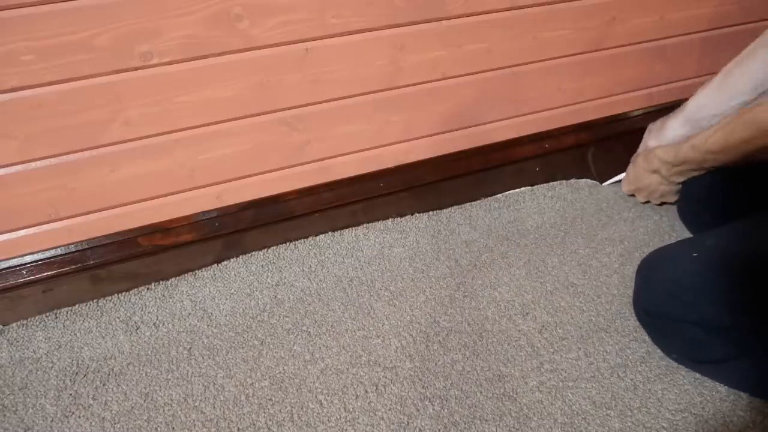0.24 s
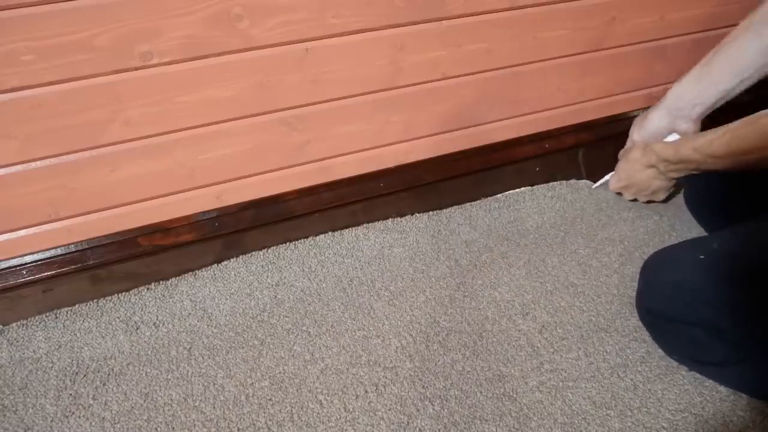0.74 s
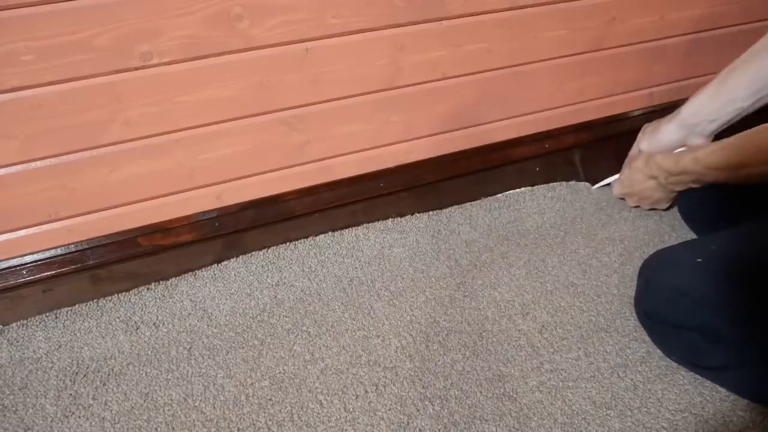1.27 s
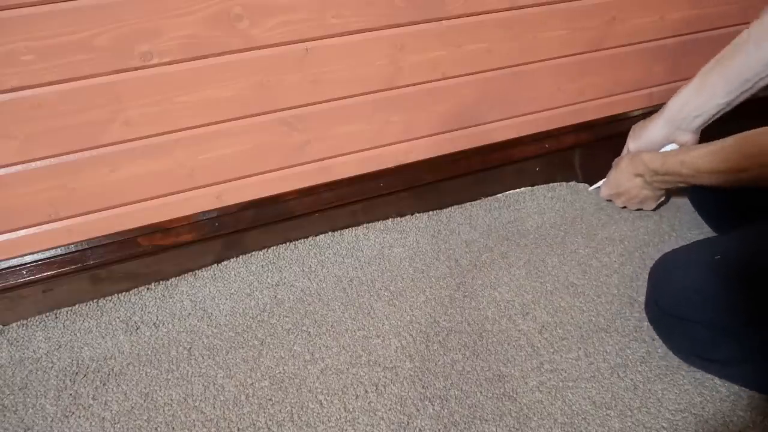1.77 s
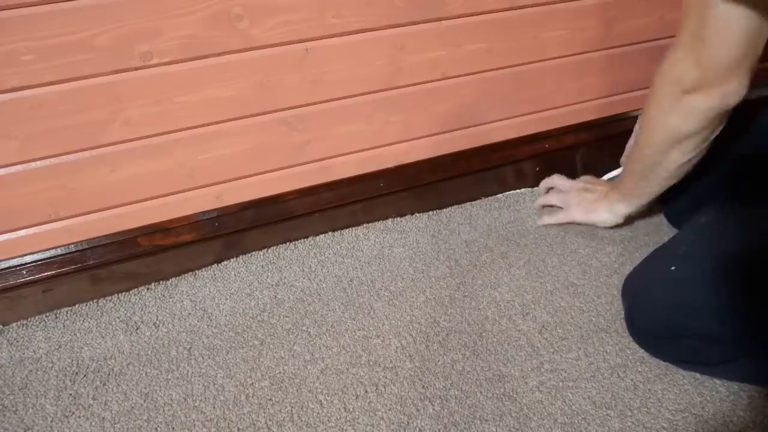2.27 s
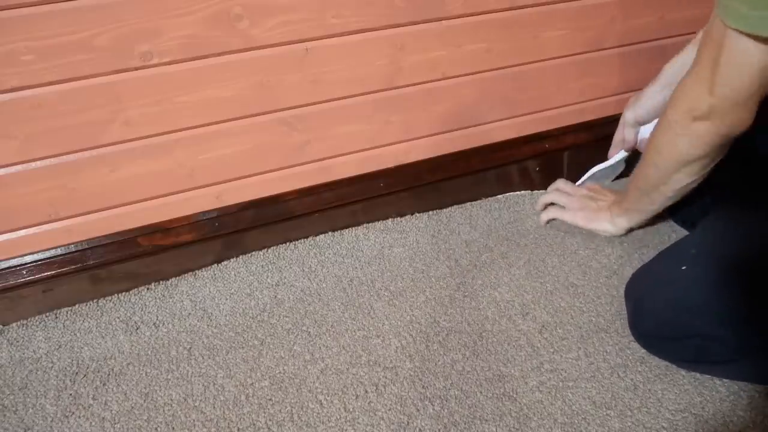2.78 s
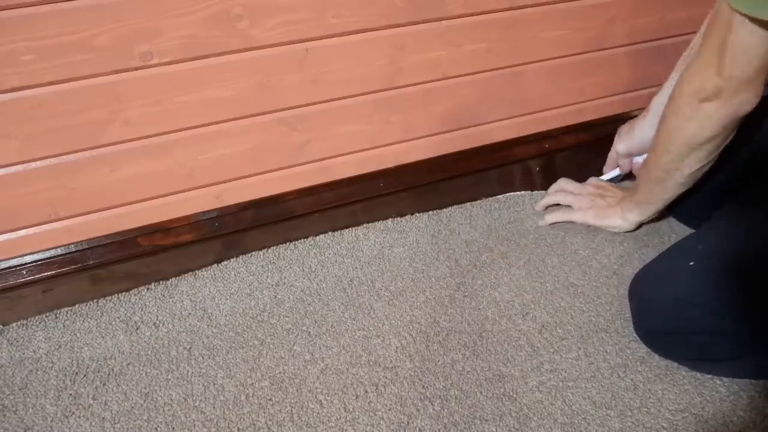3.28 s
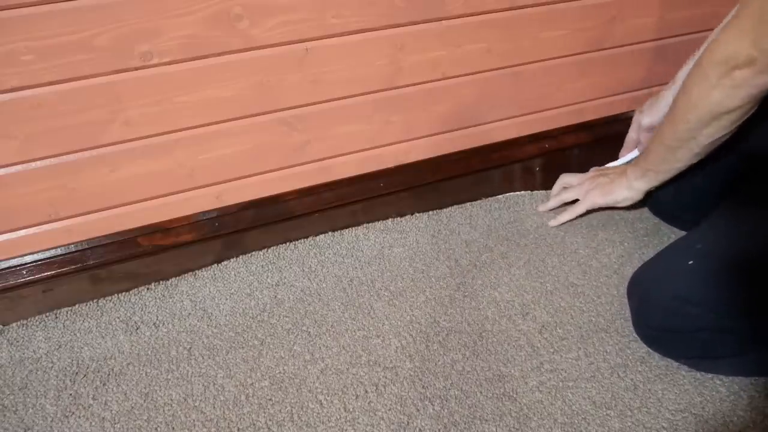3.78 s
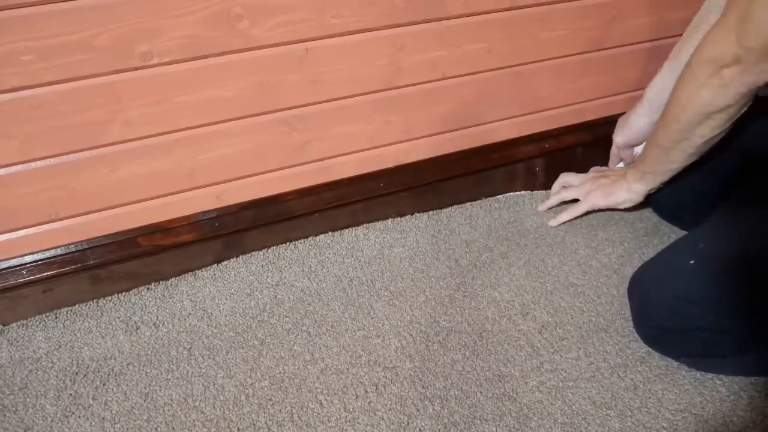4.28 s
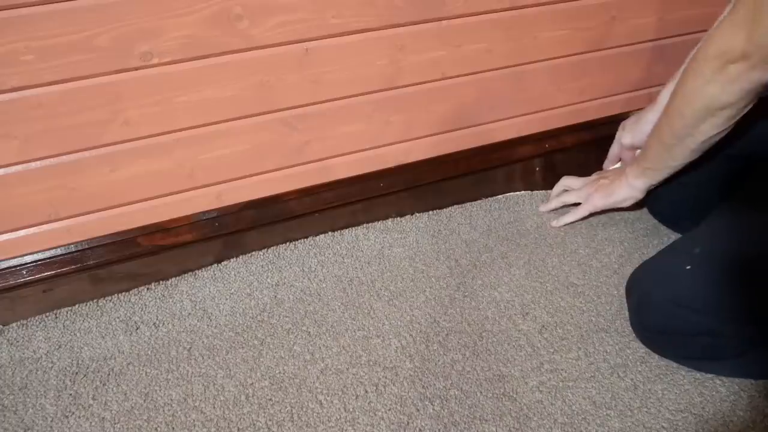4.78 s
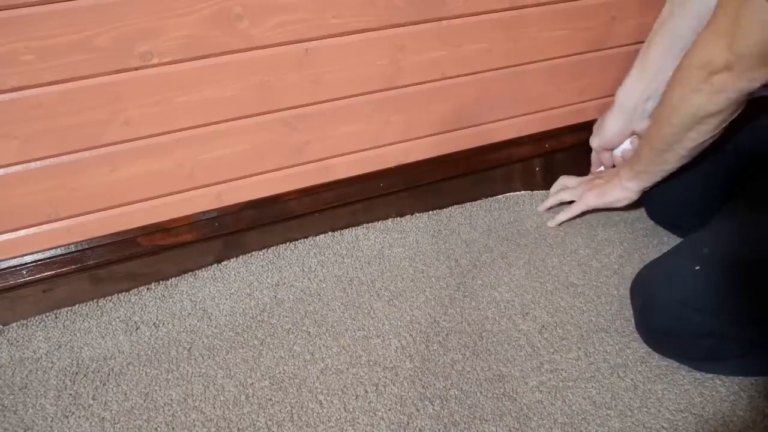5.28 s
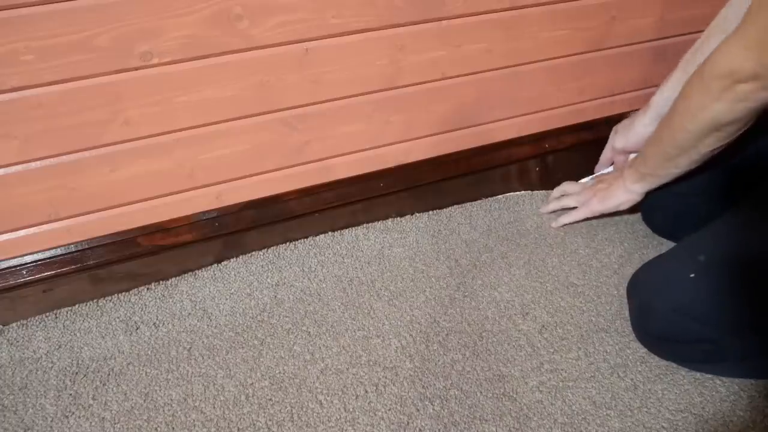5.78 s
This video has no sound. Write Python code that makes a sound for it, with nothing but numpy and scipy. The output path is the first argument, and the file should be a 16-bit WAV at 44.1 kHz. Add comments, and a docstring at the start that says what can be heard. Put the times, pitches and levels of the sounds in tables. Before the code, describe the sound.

Uneven scratchy rustles and small clicks as a hand tool tucks carpet against a wooden baseboard, snapping sharply against it midway.

```python
"""A tucking blade pushes the edge of a wool carpet under a wooden baseboard.
Each stroke flicks pile fibres and drags the stiff backing; the blade scrapes, squeaks and snaps
against the board, once hard and twice over. The kneeling worker's shifting weight sways the floor.
A small panelled room, heard through a hissy microphone with a nasal housing resonance."""
import sys
import numpy as np
from scipy import signal
from scipy.fft import rfft, irfft
from scipy.io import wavfile

SR = 44100
rng = np.random.default_rng(int(sys.argv[2]) if len(sys.argv) > 2 else 0)


def pcm_store(signal):
    """Save signal as 16-bit PCM."""
    levels = np.round(np.clip(np.atleast_2d(signal), -1, 1) * 32767)
    wavfile.write(sys.argv[1], SR, levels.astype(np.int16).T)


N = 266501
TIME = np.arange(N) / SR
HZ = np.fft.rfftfreq(N, 1 / SR)

# baseboard modes: f/Hz, level/dB, t60/s
BOARD_MODES = [(183, -10.5, 0.087), (232, -1, 0.051), (327, -10, 0.097), (341, -10, 0.048),
               (578, -6.5, 0.058), (700, -5.5, 0.015)]
# blade pushes: peak t/s, rise/s, fall/s, pile/dB, backing/dB, treble boost/dB, boom boost/dB
STROKES = [(.04, 0.096, 0.17, -66.5, -57.5, 3, 1), (.2, 0.16, 0.044, -57, -65, -8, -11),
           (.333, 0.049, 0.045, -45.5, -49.5, -5, -8), (.43, .04, 0.07, -56, -65, -6, -8),
           (0.857, 0.075, 0.067, -50, -45, -0.5, 1.5), (1.21, 0.029, 0.041, -54, -53, -16, -1),
           (1.39, 0.03, 0.05, -54, -77, -11, -10), (1.775, 0.087, 0.06, -51, -53.5, -2, 5),
           (1.85, 0.062, 0.2, -52, -53, -2.5, 2), (2.16, 0.093, 0.18, -43.5, -43.5, -16, -1),
           (2.22, 0.1, 0.31, -48.5, -42, -3.5, 0), (2.39, 0.017, 0.016, -43.5, -51, -0.5, -12),
           (2.582, 0.041, 0.057, -46, -45, -4.5, -12), (2.7, 0.079, 0.21, -57.5, -53, -12, 0),
           (2.89, 0.15, 0.11, -59.5, -58, 1, 5.5), (3.38, 0.26, 0.14, -62.5, -60, -12, 5),
           (3.615, 0.014, 0.013, -47, -60, -6, 7), (3.68, 0.074, 0.12, -52, -62, -1.5, -5),
           (3.816, 0.045, 0.087, -56.5, -64, 4, -16), (3.98, 0.012, 0.018, -51.5, -52.5, -2, -8),
           (4.19, 0.05, 0.028, -48.5, -55, -3.5, 4), (4.24, 0.033, 0.019, -61, -53.5, 6, 13.5),
           (4.35, 0.019, 0.045, -55.5, -55.5, -0.5, 10), (4.594, 0.065, 0.075, -45.5, -52, -6.5, -3),
           (4.735, 0.041, 0.071, -52.5, -58, -8, -12), (5.0, 0.23, 0.15, -66.5, -70, 8, -3),
           (5.175, 0.075, 0.067, -58.5, -52.5, 2, 7), (5.312, 0.043, 0.019, -42.5, -48, -5.5, 5),
           (5.365, 0.036, 0.0098, -42, -65, -6, 7), (5.51, 0.028, 0.073, -57, -62.5, 2, 13),
           (5.604, 0.035, 0.035, -44, -55, -1.5, -1), (5.75, 0.036, 0.012, -66, -52, 12, 3),
           (6.02, 0.035, 0.06, -55.5, -54, -8, 9)]


def gain_of(db):
    """Decibels to amplitude."""
    return 10 ** (np.asarray(db) / 20)


def unit_rms(x):
    """Scale to rms 1."""
    return x / np.sqrt(np.mean(x ** 2) + 1e-20)


def log_interp(points, hz):
    """Interpolate (f/Hz, value) rows over log frequency."""
    f, value = np.transpose(points)
    return np.interp(np.log(hz + 1), np.log(f + 1), value)


def shaped(x, response):
    """Zero-phase filter; one gain per HZ bin."""
    return irfft(rfft(x) * response, N)


def coloured(x, spectrum):
    """Filter by (f/Hz, level/dB) rows; rms 1."""
    return unit_rms(shaped(x, gain_of(log_interp(spectrum, HZ))))


def noise(spectrum, db):
    """Steady coloured noise at an rms level."""
    return gain_of(db) * coloured(rng.standard_normal(N), spectrum)


def add(mix, start_s, sound):
    """Mix a sound in, in place."""
    part = mix[max(round(start_s * SR), 0):][:len(sound)]
    part += sound[:len(part)]


def wander(rate_hz):
    """Smooth random curve, rms 1."""
    return unit_rms(shaped(rng.standard_normal(N), 1 / (1 + (HZ / rate_hz) ** 4)))


def resonate(x, hz, width_hz):
    """One resonance, peak gain 1."""
    return signal.lfilter(*signal.iirpeak(hz, hz / width_hz, fs=SR), x)


def ringing(x, modes):
    """Input plus the resonances it excites."""
    return x + sum(gain_of(db) * resonate(x, hz, width_hz) for hz, width_hz, db in modes)


def butter(x, hz, kind, order=2):
    """Causal low-pass or high-pass."""
    return signal.sosfilt(signal.butter(order, min(hz, .45 * SR), kind, fs=SR, output="sos"), x)


def swells(peak_s, rise_s, fall_s, level_db, roundness=1.8):
    """Envelope of swells summed in power; roundness 1 is pointed, 2 a bell."""
    t, power = TIME[::32], 0
    for s, rise, fall, db in zip(peak_s, rise_s, fall_s, level_db):
        away = np.maximum((s - t) / rise, (t - s) / fall)
        power += (gain_of(db) * np.exp(-abs(away) ** roundness)) ** 2
    return np.interp(TIME, t, np.sqrt(power))


def gliding(length_s, hz, glide_hz):
    """Complex tone that swells, slides through hz and fades."""
    pitch_hz = hz + glide_hz * np.linspace(-.5, .5, int(length_s * SR))
    return np.hanning(len(pitch_hz)) * np.exp(2j * np.pi * np.cumsum(pitch_hz) / SR)


def friction(slips_per_s, spread_db, rub, clump_db, clump_hz):
    """Tiny uneven slips over a smooth rub, bunched by stick-slip."""
    size = gain_of(spread_db * np.minimum(rng.exponential(1, N), 4))
    slips = size * rng.choice([-1., 1.], N) * (rng.random(N) < slips_per_s / SR)
    return (unit_rms(slips) + rub * rng.standard_normal(N)) * gain_of(clump_db * wander(clump_hz))


def room_tone():
    """Steady background, strongest in the bass."""
    # spectrum: f/Hz, relative level/dB
    spectrum = [(20, -18), (33, 0), (60, 6.5), (120, 4), (230, 5.5), (500, 1), (1000, -1), (2000, -2),
                (4000, -3), (8000, -5), (15000, -7)]
    return noise(spectrum, db=-58)


def reverb(x):
    """Dense reflections off panelled walls; each band decays at its own rate."""
    # f/Hz, t60/s
    decay = [(150, 0.27), (500, 0.69), (1500, 0.48), (4000, 0.48), (8000, 0.97), (14000, 0.25)]
    taps = rng.choice([-1., 1.], SR) * (rng.random(SR) < 4000 / SR) * (TIME[:SR] > .004)
    hz, t, bands = signal.stft(taps, SR, nperseg=256)
    early = 1 + 2.5 * np.exp(-t / 0.053)  # nearest walls: first and strongest
    fade = gain_of(-60 * t / log_interp(decay, hz)[:, None])
    tail = signal.istft(bands * early * fade, SR, nperseg=256)[1]
    return signal.fftconvolve(x, butter(tail / np.linalg.norm(tail), 9300, "low"))[:N]


def slapback(x):
    """First reflections off the floor and nearest wall."""
    # echoes: delay/s, level/dB
    echoes = [(.0044, -20), (.0104, -25), (0.0133, -29)]
    out = x.copy()
    for delay_s, db in echoes:
        add(out, delay_s, gain_of(db) * butter(x, 8400, "low"))
    return out


def floor_sway(hz=41.8, drift_hz=2, width_hz=13, tremble_db=-61.5):
    """The lowest floor mode swells as weight shifts and trembles faintly in between."""
    # weight shifts on the knees: peak t/s, rise and fall/s, level/dB
    shifts = [(.03, 0.082, -50), (1.08, 0.095, -45.5), (1.5, 0.053, -55), (1.79, 0.093, -51),
              (2.07, 0.069, -36.5), (2.28, 0.11, -40.5), (2.47, 0.074, -49), (3.37, 0.061, -48),
              (4.13, 0.066, -46), (4.3, 0.055, -45.5), (5.16, 0.056, -44), (5.5, 0.11, -56),
              (5.96, 0.066, -60)]
    peak_s, ramp_s, db = np.transpose(shifts)
    cycles = np.cumsum(hz + drift_hz * wander(15)) / SR
    sway = unit_rms(np.sin(2 * np.pi * cycles)) * swells(peak_s, ramp_s, ramp_s, db, roundness=1.6)
    tremble = resonate(resonate(rng.standard_normal(N), hz, width_hz), hz, width_hz)
    return sway + gain_of(tremble_db) * unit_rms(tremble)


def idle_rub(db, swing_db=2, rest_db=-14.5, rest_s=0.057):
    """Envelope of light hand rubbing between pushes; dips at each rest."""
    # hands still: t/s
    rests = [.57, 1.56, 4.05, 4.44, 4.85]
    still = sum(np.exp(-((TIME - s) / rest_s) ** 2) for s in rests)
    return gain_of(db + swing_db * wander(11) + rest_db * still)


def backing_drag(board_db=-4, boom_hz=210, boom_octaves=0.49, ramp_scale=0.97):
    """Stiff backing slips coarsely and rings the baseboard; leaning on the board adds boom."""
    # drag spectrum: f/Hz, relative level/dB
    spectrum = [(50, 0.5), (110, -2), (150, -0.5), (185, 0), (240, -4), (350, -1.5), (550, -5), (800, -6),
                (1200, -9), (1800, -22), (5000, -49)]
    slips = friction(slips_per_s=1000, spread_db=2.5, rub=.6, clump_db=1.1, clump_hz=35)
    modes = [(hz, 2.2 / t60, db + board_db) for hz, db, t60 in BOARD_MODES]
    drag = coloured(ringing(slips, modes), spectrum)
    boom = shaped(drag, np.exp(-(np.log2((HZ + 1) / boom_hz) / boom_octaves) ** 2))
    peak_s, rise_s, fall_s, _, backing_db, _, lean_db = np.transpose(STROKES)
    timing = peak_s, rise_s * ramp_scale, fall_s * ramp_scale
    idle = idle_rub(db=-62.5)
    push = np.hypot(idle, swells(*timing, backing_db))
    boom_push = np.hypot(idle, swells(*timing, backing_db + lean_db))
    return (drag - boom) * push + boom * boom_push


def pile_flicks(treble_hz=5500):
    """Wool fibres flick past the blade; a steeper blade is brighter."""
    # fibre spectrum: f/Hz, relative level/dB
    spectrum = [(300, -24), (700, -19), (1100, 0.5), (1800, -0.5), (2500, -0.5), (3500, -1.5), (4700, -4),
                (5600, -1), (7500, -4.5), (9000, -9.5), (12000, -11), (16000, -56)]
    # blade resonances: f/Hz, width/Hz, level/dB
    blade_modes = [(3400, 140, -7), (3830, 380, -9), (6300, 150, -18)]
    fibres = friction(slips_per_s=3500, spread_db=1, rub=1, clump_db=1.5, clump_hz=57)
    rustle = coloured(ringing(fibres, blade_modes), spectrum)
    treble = shaped(rustle, HZ ** 4 / (HZ ** 4 + treble_hz ** 4))
    peak_s, rise_s, fall_s, pile_db, _, steep_db, _ = np.transpose(STROKES)
    idle = idle_rub(db=-63.5)
    push = np.hypot(idle, swells(peak_s, rise_s, fall_s, pile_db))
    treble_push = np.hypot(idle, swells(peak_s, rise_s, fall_s, pile_db + steep_db))
    return (rustle - treble) * push + treble * treble_push


def brief_chafes():
    """Short narrow-band rubs: low board groans, mid backing rasps, nasal ticks and high blade scrapes."""
    # rubs: centre t/s, length/s, f/Hz, glide/Hz, width/Hz, level/dB
    rubs = [(0.131, 0.25, 2550, 0, 160, -66), (.19, 0.12, 3400, -100, 300, -63),
            (0.312, 0.078, 346, 7, 50, -49.5), (0.333, 0.098, 160.3, -3, 50, -51.5),
            (.332, 0.086, 951, -3, 600, -50.5), (0.333, 0.059, 1380, -47, 300, -52),
            (0.336, 0.063, 2600, -2, 900, -51), (.82, 0.088, 950, 3, 700, -52.5),
            (0.849, 0.14, 206, -5, 70, -46), (0.851, .11, 740, -9, 100, -52),
            (0.88, 0.076, 3490, 0, 1000, -47), (1.772, 0.074, 3490, -2, 1000, -48),
            (2.119, .03, 225, 2, 120, -39.5), (2.159, 0.058, 916, -4, 249, -45.5),
            (2.25, .25, 1394, 1, 140, -55), (2.165, .15, 462, -100, 258, -41.5),
            (2.189, 0.22, 2270, -100, 130, -50.5), (2.576, .022, 1270, 4, 300, -46),
            (3.36, 0.08, 984, 0, 500, -56), (3.671, .11, 3550, -2, 1000, -55),
            (3.682, 0.015, 1410, 0, 250, -58), (3.73, 0.0097, 1400, 0, 300, -60),
            (3.812, 0.011, 1376, 0, 250, -49), (3.915, 0.017, 1380, 0, 250, -56),
            (3.979, .017, 1324, -2, 240, -48), (4.172, .018, 1430, 0, 250, -57),
            (4.571, 0.047, 1344, -120, 350, -52.5), (4.633, 0.079, 1168, -120, 150, -58),
            (4.58, 0.12, 730, 0, 250, -56), (5.316, .056, 3800, -300, 1000, -39),
            (5.326, 0.096, 1370, 3, 240, -56.5), (5.609, 0.12, 1367, -36, 200, -55.5),
            (5.756, 0.062, 680, 10, 400, -55)]
    out = np.zeros(N)
    for s, length_s, hz, glide_hz, width_hz, db in rubs:
        tone = gliding(length_s, hz, glide_hz)
        real, imag = butter(rng.standard_normal((2, SR)), width_hz / 2, "low")[:, -len(tone):]
        roughness = (real + 1j * imag) / np.sqrt(np.mean(real ** 2 + imag ** 2) / 2)
        add(out, s - length_s / 2, gain_of(db) * (tone * roughness).real)
    return out


def blade_squeaks(waver_rate_hz=170, flutter_db=2.5):
    """Near-regular stick-slip sings a thin tone; more waver is hoarser."""
    # squeaks: centre t/s, length/s, f/Hz, glide/Hz, level/dB, waver/Hz
    squeaks = [(.12, .28, 2540, 20, -66, 75), (.185, .12, 4260, 0, -65, 120),
               (.222, .046, 2490, -260, -55.5, 60), (2.16, .075, 4040, -200, -49.5, 45),
               (2.215, .09, 6330, -100, -56, 60), (2.217, .08, 4020, 50, -49, 45),
               (2.222, .08, 3190, -120, -54, 50), (2.41, .075, 4080, 300, -58, 120),
               (3.83, .05, 5300, 0, -57.5, 170)]
    out, unsteady = np.zeros(N), wander(waver_rate_hz)
    for s, length_s, hz, glide_hz, db, waver_hz in squeaks:
        tone = gliding(length_s, hz, glide_hz)
        waver_cycles = np.cumsum(waver_hz * unsteady[round(s * SR):][:len(tone)]) / SR
        add(out, s - length_s / 2, gain_of(db) * (tone * np.exp(2j * np.pi * waver_cycles)).real)
    return np.sqrt(2) * out * gain_of(flutter_db * wander(waver_rate_hz))


def blade_knocks(grit_s=0.0022, crack_cutoff_ratio=3.64, thud_cutoff_ratio=0.3):
    """Blade hits board: a crack, clean on bare wood or gritty on carpet, plus the board's thud."""
    # hits: t/s, crack peak/dB, crack f/Hz, crack Q, thud before filters/dB, thud pitch ratio, grit 0-1
    hits = [(.678, -38, 1200, 0.86, -40, 1.12, 0.18), (0.8403, -37, 895, 1.2, -38, 1.15, 0.15),
            (0.8683, -34, 1190, 2, -37, 1.03, 0.02), (1.829, -29.5, 3600, 1.2, -44, 0.67, 0.08),
            (1.853, -26, 4300, 1.1, -60, 1.1, 0.07), (1.8533, -35, 4800, .9, -58, 1.3, 0),
            (1.866, -35, 4200, 1, -58, 0.83, 0.2), (2.071, -33, 1210, 1.7, -58, 0.75, 0.17),
            (2.112, -40, 700, 1, -33, 1.1, 0.14), (2.273, -39, 1000, .9, -34, 0.97, 0),
            (2.509, -48, 588, .9, -25.5, 0.96, 0.1), (2.6255, -23.5, 1600, 0.96, -29.5, 0.98, 0.14),
            (2.631, -28.5, 640, 3.9, -28.5, 1.03, 0.21), (2.642, -35, 700, 1.6, -35, 0.73, 0.08),
            (2.8004, -7, 2850, 1.9, -24.5, 1.085, 0.08), (2.8011, -21.5, 1000, 0.69, -42, 1.4, 0.08),
            (2.8187, -11.5, 10000, .9, -28.5, 0.99, 0.07), (2.8190, -16.5, 1150, 1.8, -48, 2.6, 0.12),
            (2.8205, -12.5, 2200, 0.45, -34, 1.45, 0), (2.8205, -24, 11000, 1.2, -60, 1, 0.1),
            (2.9632, -23, 2230, 0.56, -69, 0.9, 0.05), (3.812, -40, 1510, 1.1, -66, 1, 0.1),
            (3.976, -35, 2550, .9, -55, .86, 0.1), (4.243, -46, 900, 1, -43, 1.1, 0.04),
            (4.322, -31, 4540, 0.77, -48.5, 1.6, 0.13), (4.335, -39, 2500, 0.64, -44, 1.2, 0.17),
            (4.36, -33.5, 4000, 0.9, -57, 1.6, 0.06), (4.646, -31, 1700, 0.73, -45.5, 1.13, .08),
            (5.185, -51, 700, 0.81, -33.5, 1.1, 0), (5.489, -38, 1460, 1, -44, 0.94, 0.08),
            (5.7378, -40, 850, 1.1, -32.5, 0.96, 0), (5.7401, -35.5, 640, 1.5, -29.5, 0.91, 0.13)]
    out, t = np.zeros(N), np.arange(SR // 4) / SR
    for s, crack_db, crack_hz, q, thud_db, pitch, grit in hits:
        contact = (t == 0) + grit * rng.standard_normal(len(t)) * np.exp(-t / grit_s)
        crack = resonate(contact, crack_hz, min(crack_hz / q, SR / 3))
        crack = butter(crack, crack_hz * crack_cutoff_ratio, "low")
        thud = sum(gain_of(db - 60 * t / t60) * np.sin(2 * np.pi * hz * pitch * t)
                   for hz, db, t60 in BOARD_MODES)
        thud = butter(thud, crack_hz * thud_cutoff_ratio, "low")  # padded blows reach only low modes
        thud = butter(thud, 150, "high", order=4)  # a narrow board radiates little bass
        add(out, s, gain_of(crack_db) * crack / abs(crack).max() + gain_of(thud_db) * thud)
    return out


def scene():
    """Work dead ahead; only the reverb differs slightly between channels."""
    rubbing = pile_flicks() + brief_chafes() + blade_squeaks() + backing_drag()
    knocks = slapback(blade_knocks())
    to_walls = gain_of(-11) * rubbing + gain_of(-14.5) * knocks
    side = gain_of(-18) * reverb(to_walls) * np.array([[1], [-1]])
    return rubbing + knocks + reverb(to_walls) + side + floor_sway() + room_tone()


def record(dry):
    """Microphone housing resonance, preamplifier hiss per channel, then the band limit."""
    # housing resonances: f/Hz, width/Hz, level/dB
    housing_modes = [(1356, 106, 3), (1429, 70, 2.5)]
    # preamplifier hiss: f/Hz, relative level/dB
    hiss_spectrum = [(50, -4), (700, -2.5), (1500, -8.5), (4000, -6), (7500, -4), (9000, -.5),
                     (15000, -1.5)]
    hiss = np.array([noise(hiss_spectrum, db=-61.5) for _ in range(2)])
    low_pass = signal.firwin(511, cutoff=15800, window=("kaiser", 9), fs=SR)
    return signal.oaconvolve(ringing(dry, housing_modes) + hiss, low_pass[None], "same")


dry = scene()
out = record(dry)
pcm_store(out)
```